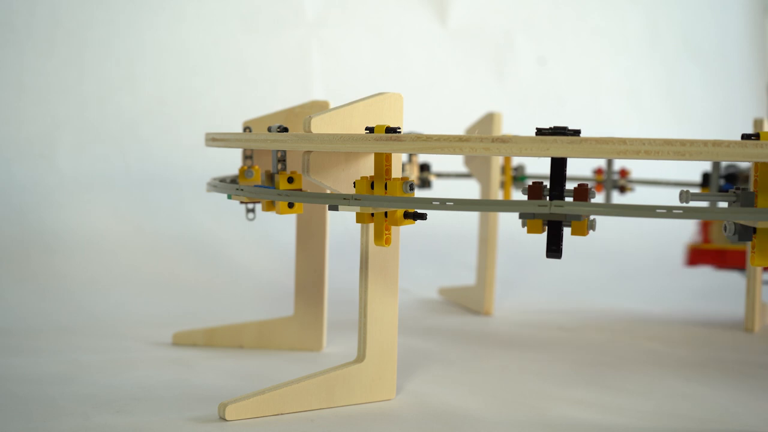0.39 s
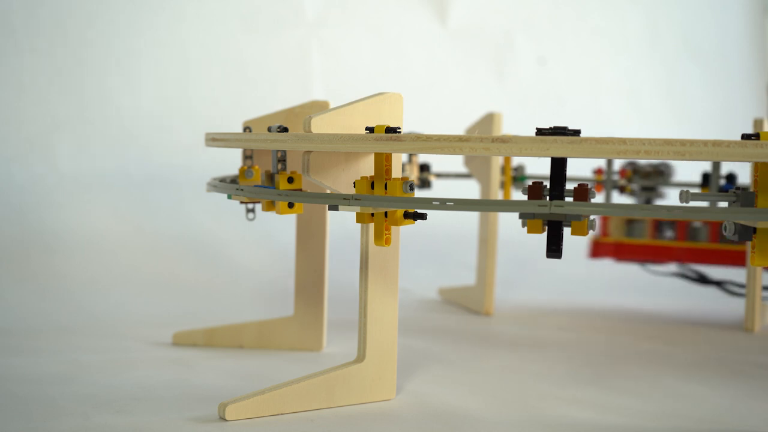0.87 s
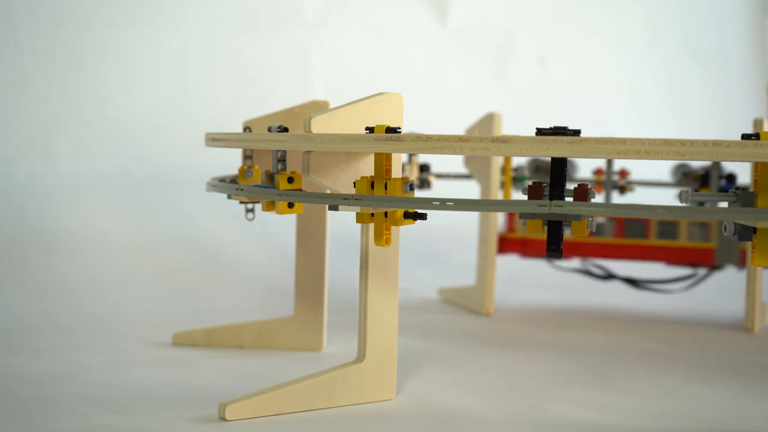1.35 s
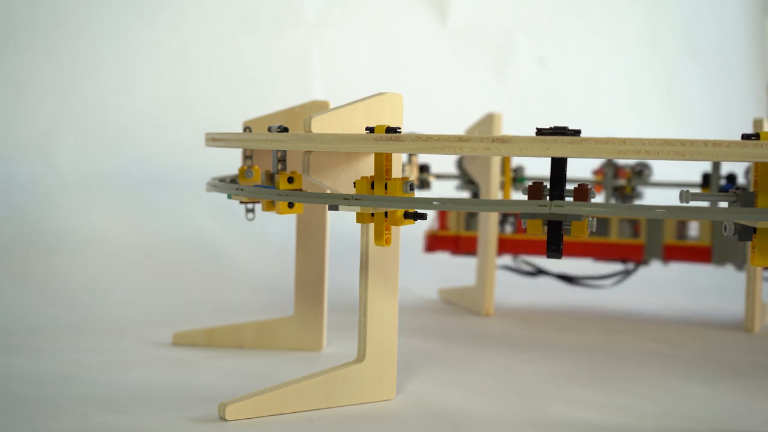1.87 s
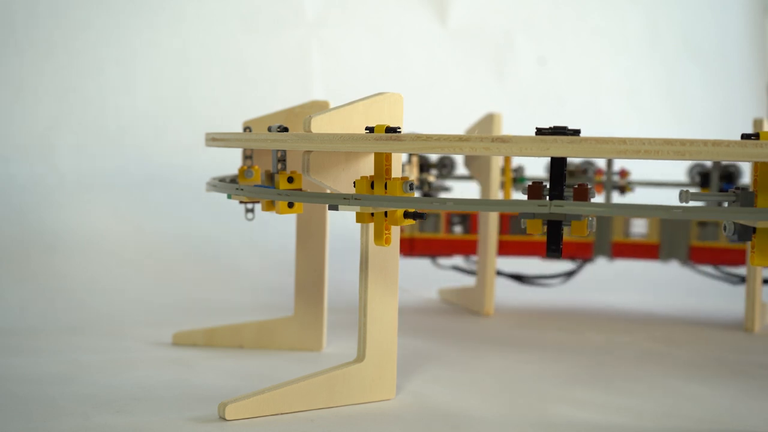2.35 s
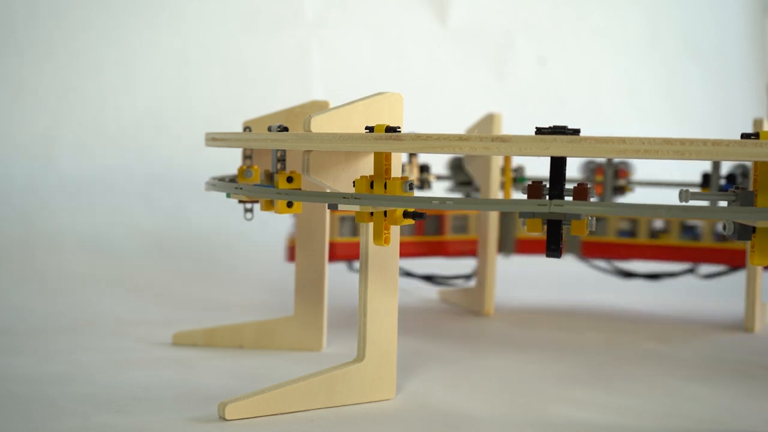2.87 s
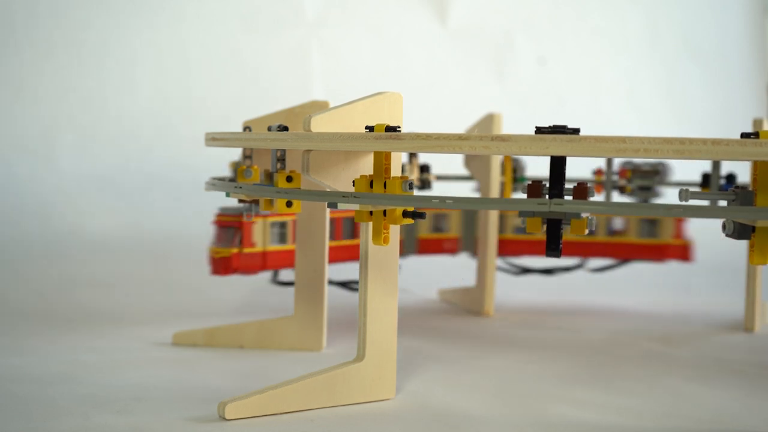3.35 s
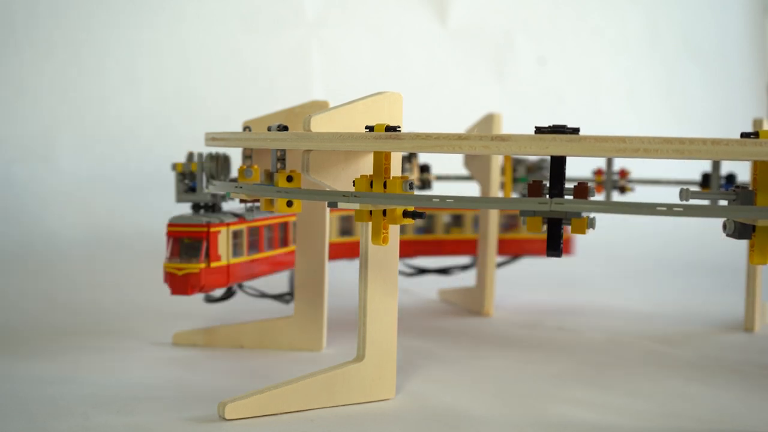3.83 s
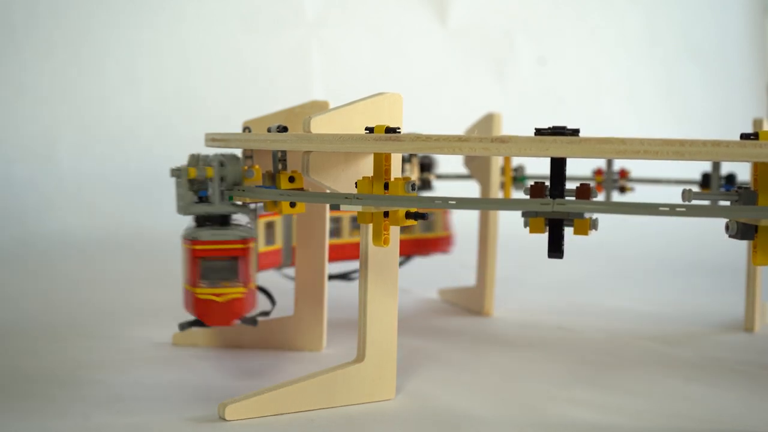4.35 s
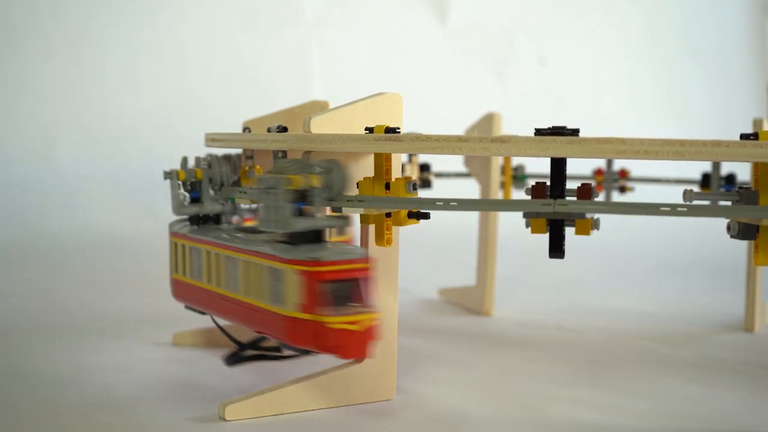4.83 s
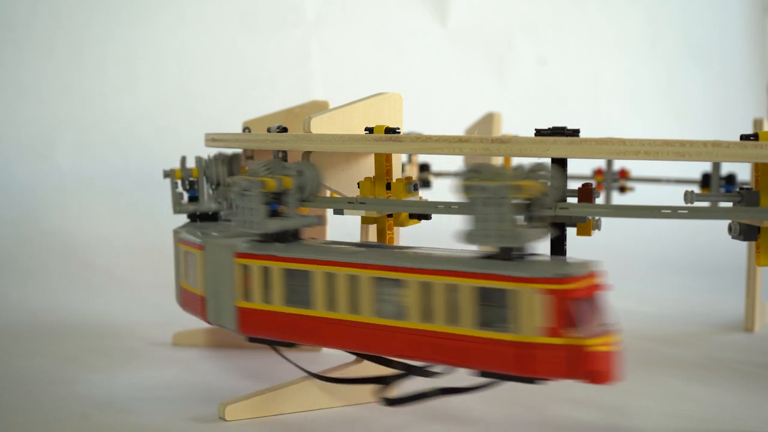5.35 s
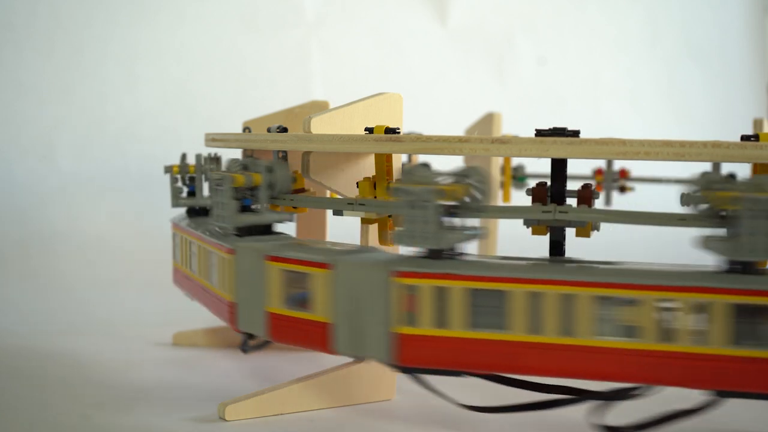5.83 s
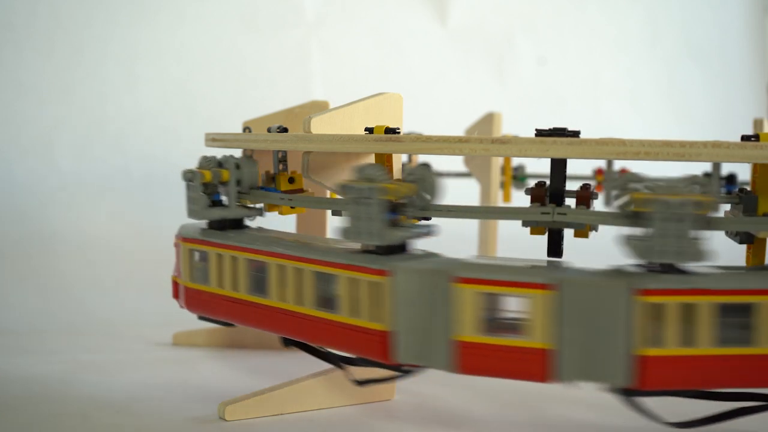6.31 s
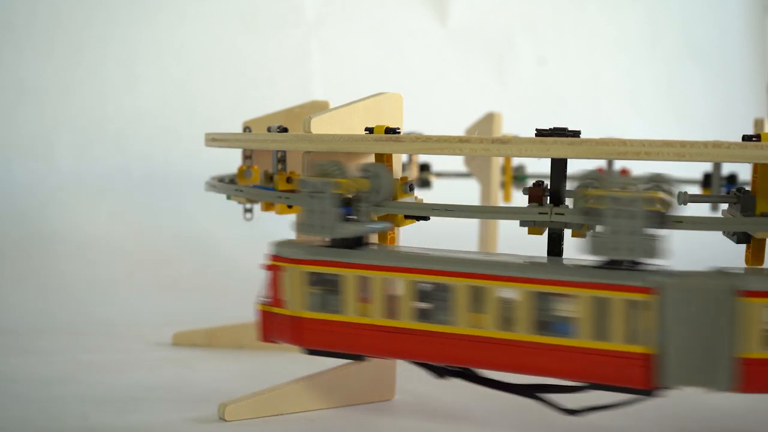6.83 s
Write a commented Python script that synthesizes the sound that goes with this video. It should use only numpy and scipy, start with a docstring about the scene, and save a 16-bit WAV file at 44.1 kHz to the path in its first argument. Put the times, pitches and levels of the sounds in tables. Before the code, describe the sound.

Close stereo pickup, dry and weighted to the left: tiny motors and plastic gears patter in a rough, bright whir, with hollow car bodies rattling and rails humming faintly. After a steady opening it thins near two seconds, where wheels clatter over a joint, then swells to its fullest around five to six seconds as the hanging toy train passes. Small knocks and crisp ticks dot the run, which continues to the end.

```python
"""A dense gear whir patters at once; it fades near 2 s, then returns stronger, over rattle and rumble.
It is a plastic toy monorail hanging from a wooden loop track in a small room.
One uneven meshing force modulates noise shaped by the spectra of gears, car bodies and track.
Narrow resonances of housing, hollow cars, rails and motors swell at set times.
Wheels knock over rail joints as decaying modes, and a part ticks now and then as decaying noise."""
import sys
import numpy as np
from scipy import signal
from scipy.fft import rfft, irfft, next_fast_len
from scipy.io import wavfile
from scipy.ndimage import uniform_filter1d, map_coordinates

SR = 44100
rng = np.random.default_rng(int(sys.argv[2]) if len(sys.argv) > 2 else 0)


def wrap_up_sound(samples):
    """Save the sound to the file named by the first command line argument, as 16-bit audio."""
    columns = np.atleast_2d(samples).T
    # keep every value between -1 and 1, then stretch to whole-number steps
    tamed = np.clip(columns, -1, 1)
    steps = np.round(tamed * 32767).astype(np.int16)
    wavfile.write(sys.argv[1], SR, steps)


def elevation(decibels):
    """Turn decibel levels (scalar or array-like) into linear amplitude ratios."""
    levels = np.asarray(decibels, float)
    return 10 ** (levels / 20)


N = 306495

# Whir level and side over time; it fades near 2 s, then returns stronger:
# (time [s], whir level [dB], brush hiss against whir [dB], left-right difference [dB])
WHIR_COURSE = [(0.0, -41.5, -9.5, -5), (0.19, -39.5, -6, -5), (0.41, -39.5, -8, -4.5),
               (0.95, -41, -9, -4.5), (1.47, -39.5, -6, -5), (1.6, -41.5, -6, -4), (1.79, -44.5, -10, -4),
               (1.83, -48, -10, -4.5), (2.0, -50, -11, -5.5), (2.13, -48, -11, -6), (2.26, -50, -9, -4),
               (2.42, -45, -6, -7), (2.52, -43, -9, -4), (2.61, -40.5, -8, -4), (3.1, -38.5, -8.5, -3),
               (4.0, -37, -9, -2), (4.7, -36, -10.5, -1.5), (5.48, -35.5, -6.5, -2.5),
               (5.79, -36, -8.5, -2.5), (6.3, -35.5, -8, -3), (6.95, -36.5, -5, -5)]
# Rattle and rumble levels over time, dipping near 2 s: (time [s], car rattle level [dB], track roll level [dB])
RATTLE_AND_RUMBLE = [(0, -46, -52.5), (.3, -44.5, -50), (.65, -46.5, -52.5), (1.6, -44.5, -51.5),
                     (1.95, -51, -58), (2.25, -49, -58), (2.45, -47.5, -56), (2.63, -44.5, -56),
                     (3.4, -43, -53), (4.3, -43.5, -53.5), (4.75, -43.5, -51.5), (5.4, -43, -51.5),
                     (6, -43.5, -51.5), (6.95, -44.5, -51)]


def unit(x):
    """Normalisation: scale a signal to rms 1."""
    return x / np.sqrt(np.mean(x ** 2) + 1e-20)


def along(points, hz):
    """Interpolation of (frequency [Hz], value) points on a logarithmic frequency axis."""
    f, v = np.transpose(points)
    return np.interp(np.log(hz + 1), np.log(f + 1), v)


def curves(rows):
    """Linear interpolation in time: one value per sample for each column after the time."""
    s, *columns = np.transpose(rows)
    return [np.interp(np.arange(N) / SR, s, column) for column in columns]


def wobble(rate):
    """Slow random modulation: a smooth curve through random knots, rate knots a second."""
    knots = rng.standard_normal(N // 40 + 4)
    return map_coordinates(knots, [np.arange(N) * rate / SR])


def filtered(x, response):
    """Linear filtering: multiply the spectrum of x by a response of frequency."""
    m = next_fast_len(N + 8192)
    return irfft(rfft(x, m) * response(np.fft.rfftfreq(m, 1 / SR)), m)[..., :N]


def panned(db):
    """Intensity stereo: left and right gains for a left-right level difference."""
    return elevation(np.array([db / 2, -db / 2]))


def pair(two, spectrum):
    """Coherence: coloured mid and side signals give a left-right likeness that varies with frequency."""
    # Microphone pair: (frequency [Hz], left-right correlation [1])
    likeness = [(60, .99), (130, .97), (290, .95), (640, .85), (1410, .74), (3100, .3), (4400, .22),
                (7000, .27), (10000, .32), (15000, .15)]

    def turn(hz):
        return np.arccos(np.clip(along(likeness, hz), -1, 1)) / 2

    def gain(hz):
        # steep roll-off below the first point of the spectrum
        return elevation(along(spectrum, hz)) * np.minimum(hz / spectrum[0][0], 1) ** 4

    mid, side = filtered(two, lambda hz: gain(hz) * [np.cos(turn(hz)), np.sin(turn(hz))])
    return unit(np.array([mid + side, mid - side]))


def patter(spectrum, uneven_db, patchy_db):
    """Shot noise: contacts too dense to count merge into noise, uneven in time and patchy in frequency."""
    z = signal.stft(rng.standard_normal((2, N)), nperseg=512)[2]
    field = rng.standard_normal(z.shape[1:])
    field = uniform_filter1d(field, size=5, axis=0)  # over frequency bins
    field = uniform_filter1d(field, size=10, axis=1)  # over frames
    two = signal.istft(z * elevation(patchy_db * unit(field)), nperseg=512)[1][:, :N]
    return pair(two * elevation(uneven_db), spectrum)


def ring(hz, width_hz, steady=.5):
    """Resonance under random excitation: narrow-band noise on a carrier; steady 0-1 evens its envelope."""
    a, b = filtered(rng.standard_normal((2, 2, N)), lambda f: 1 / (1 + (2 * f / width_hz) ** 3))
    phase = 2 * np.pi * np.cumsum(hz * np.ones(N)) / SR
    envelope = np.hypot(a, b) + 1e-9
    band = (a * np.cos(phase) + b * np.sin(phase)) / envelope ** np.clip(steady, 0, 1)
    return pair(band, [(np.min(hz) / 2, 0)])


def flecks(count, mid_hz, octaves, life_s, spread_db):
    """Transient resonance: small parts along the train sing for a moment at scattered pitches and places."""
    u = rng.random((count, 1))
    z = rng.standard_normal((count, 3))  # pitch, side and strength
    t = np.arange(SR // 12) / SR
    hz = np.clip(mid_hz * 2 ** (octaves * z[:, :1]), 500, SR / 3)
    swell = np.sin(np.pi * np.clip(t / life_s, 0, 1)) ** 2
    rings = elevation(spread_db * z[:, 2:]) * np.sin(2 * np.pi * hz * t) * swell
    at = (u * N).astype(int) + np.arange(len(t))
    sides = panned(4 * z[:, 1:2])
    return unit(np.array([np.bincount(at.ravel(), (rings * g).ravel(), minlength=N)[:N] for g in sides]))


def swelling(rest_db, swells):
    """Amplitude envelope: a wavering rest level summed in power with a smooth arch at each swell."""
    t = np.arange(0, N, 64) / SR
    rises = sum(elevation(db) * np.cos(np.pi * np.clip((t - s) / length, -.5, .5)) ** 2
                for s, *_, db, length in swells)
    rest = elevation(rest_db + 3 * wobble(7))
    return np.hypot(rest, np.interp(np.arange(N) / SR, t, rises))


def gears(mesh):
    """Forced vibration: meshing drives whir, flecks and housing, as brush noise and the motor can ring."""
    # Noise spectra: (frequency [Hz], relative density [dB])
    whir_spectrum = [(1650, -70), (2800, -6.5), (3250, -6), (3730, 0), (4580, 0.5), (6100, 2), (8710, -2.5),
                     (9650, -2), (10800, -10), (14000, -40), (22000, -120)]
    hiss_spectrum = [(6060, -52), (10300, -6), (11300, -3.5), (12400, -0.5), (13200, 2), (14300, -0.5),
                     (15500, -2), (16000, -7)]
    # A gear housing sings up: (centre time [s], frequency [Hz], swell level [dB], full length [s])
    housing_swells = [(2.75, 4670, -54, .5), (3.607, 4650, -57, 0.83), (4.304, 4680, -46, .5),
                      (4.8, 4640, -57, .5), (5.2, 4620, -46, 0.47), (5.598, 4200, -55, .25),
                      (6.001, 4940, -50, .3), (6.36, 4696, -42, 0.18), (6.851, 4620, -45, 0.43)]
    whir_db, hiss_db, pan_db = curves(WHIR_COURSE)

    whir = patter(whir_spectrum, 0.52 * mesh + 0.41 * wobble(30), patchy_db=0.1)
    whir = whir + elevation(-13.5) * flecks(count=1200, mid_hz=5246, octaves=.4, life_s=0.036, spread_db=2.0)

    hiss = patter(hiss_spectrum, 0.77 * mesh + .5 * wobble(40) + 1.0 * wobble(600), patchy_db=1.0)
    can_db = -4.5 + 1.5 * wobble(12) + 1.5 * mesh  # against the hiss
    can_hz = 9700 + 60.5 * wobble(2.5)
    can = elevation(can_db) * ring(can_hz, width_hz=780, steady=.1)

    housing_gain = swelling(whir_db - 18.5, housing_swells)
    housing = housing_gain * ring(curves(housing_swells)[0], width_hz=610, steady=.1)
    return panned(pan_db) * (elevation(whir_db) * (whir + elevation(hiss_db) * (hiss + can)) + housing)


def cars(mesh):
    """Cavity resonance: plastic bodies rattle and their main hollow shifts in pitch as they swing round."""
    # Noise spectrum: (frequency [Hz], relative density [dB])
    rattle_spectrum = [(680, -20), (1150, -7.5), (1420, -1), (1710, -3), (2520, -1), (3400, -8.5),
                       (4420, -28), (7480, -120)]
    # The main hollow sings up: (centre time [s], frequency [Hz], swell level [dB], full length [s])
    hollow_swells = [(0.239, 1458, -54, 0.11), (1.135, 1348, -50, 0.18), (1.354, 1354, -56, 0.83),
                     (1.549, 1600, -56, 0.1), (2.107, 1523, -52, .09), (3.554, 1499, -50, .3),
                     (3.74, 1480, -51, 0.23), (3.901, 1427, -48.5, 0.33), (4.028, 1540, -49.5, 0.27),
                     (4.311, 1498, -47, .2), (4.49, 1508, -47, .12), (4.598, 1502, -52, .07),
                     (4.801, 1490, -50, 0.75), (5.047, 1476, -56, 0.35), (5.439, 1600, -45.5, 0.16),
                     (5.621, 1538, -51, 0.19), (5.867, 1490, -46.5, 0.24), (6.104, 1470, -47.5, .2),
                     (6.37, 1436, -45, 0.16), (6.686, 1470, -53, 0.22), (6.924, 1520, -46.5, .3)]
    rattle_db, roll_db = curves(RATTLE_AND_RUMBLE)
    pan_db = curves(WHIR_COURSE)[2] + 1.5  # the bodies sit left of the motors

    rattle = patter(rattle_spectrum, 0.61 * mesh, patchy_db=0.8)
    rattle = rattle + elevation(-10.5) * flecks(count=500, mid_hz=2185, octaves=.3, life_s=0.05, spread_db=2.0)
    hollow_gain = swelling(roll_db - 8.5, hollow_swells)
    hollow = hollow_gain * ring(curves(hollow_swells)[0], width_hz=184, steady=0.14)
    return panned(pan_db) * (elevation(rattle_db) * rattle + hollow)


def track(mesh):
    """Structure-borne sound: frame rumble and wheel roll, with swelling rail modes, motor hum and murmur."""
    # Noise spectra: (frequency [Hz], relative density [dB])
    rumble_spectrum = [(120, -53), (200, -15.5), (243, -8.5), (333, -7), (580, 1.5), (637, -12), (700, 4.5),
                       (910, -34), (1540, -120)]
    roll_spectrum = [(380, -29), (650, 0), (717, -0.5), (829, 0), (1250, -3), (1620, -30), (2750, -120)]
    deep_spectrum = [(75, -30), (95, -3.5), (120, -4.5), (150, -1), (200, -2), (260, -3), (440, -120)]
    # Rail modes: (frequency [Hz], width at half amplitude [Hz], rest level against the roll [dB])
    rail_modes = [(257, 38, -24.5), (420, 100, -20.5), (635, 19, -15)]
    # A mode swells: (centre time [s], mode frequency [Hz], swell level [dB], full length [s])
    mode_swells = [(.11, 257, -60, 0.14), (0.294, 257, -58.5, 0.27), (0.797, 257, -59.5, 0.35),
                   (1.288, 257, -64, 0.18), (1.62, 257, -64, .15), (2.41, 257, -69, 0.3),
                   (4.647, 257, -66, 0.27), (4.926, 257, -66, .2), (6.904, 257, -75, .3),
                   (.55, 257, -71, 0.44), (1.05, 257, -67, 0.48), (2.75, 257, -74, 0.67),
                   (3.248, 257, -72, .15), (4.302, 257, -72, 0.75), (6.053, 257, -81, 0.26),
                   (.77, 420, -60, 0.22), (1.53, 420, -63, 0.21), (2.62, 420, -64, 0.23),
                   (4.41, 420, -63, 0.21), (4.736, 420, -52, .12), (4.946, 420, -57, .12),
                   (5.297, 420, -56, 0.64), (5.66, 415, -61, 0.6), (5.92, 420, -55, .2),
                   (6.303, 420, -63, 0.21), (6.776, 420, -55.5, 0.17), (0.192, 635, -50, 0.17),
                   (.5, 635, -69, .35), (0.79, 635, -49.5, 0.2), (1.275, 635, -51, 0.11),
                   (2.284, 635, -55.5, .1), (2.6, 635, -49, 0.28), (3.05, 635, -62, 0.23),
                   (4.49, 635, -57, .2), (4.728, 635, -53, 0.14), (5.05, 635, -63, 0.082),
                   (5.597, 635, -59, 0.22), (5.906, 635, -53, .12), (6.07, 635, -53, 0.14),
                   (6.331, 635, -59, .25), (6.778, 635, -55, 0.16)]
    # The motor hum swells: (centre time [s], frequency [Hz], swell level [dB], full length [s])
    hum_swells = [(.2, 721, -54, .2), (0.419, 720, -71, .25), (0.811, 720, -51, 0.2),
                  (1.219, 751, -52, 0.34), (1.515, 762, -51, .25), (1.92, 740, -58, 0.14),
                  (2.851, 725, -55.5, .2), (3.037, 722, -54.5, 0.37), (3.23, 722, -52, .12),
                  (3.947, 705, -61, 0.23), (4.571, 691, -49.5, .14), (4.87, 695, -55, 0.64),
                  (5.901, 720, -55, .12), (6.157, 743, -50, .17), (6.38, 717, -50.5, .2),
                  (6.765, 705, -57, .25)]
    # The deep murmur swells: (centre time [s], swell level [dB], full length [s])
    murmur_swells = [(.95, -77, 0.6), (2.55, -80, .4), (3.712, -81, .5), (5.954, -81, 0.58),
                     (6.847, -75, 0.67)]
    roll_db = curves(RATTLE_AND_RUMBLE)[1]

    rumble = elevation(roll_db - 5) * patter(rumble_spectrum, .5 * mesh, patchy_db=1.86)
    roll = elevation(roll_db) * patter(roll_spectrum, .5 * mesh, patchy_db=1.5)
    deep = swelling(-80.5, murmur_swells) * pair(rng.standard_normal((2, N)), deep_spectrum)

    modes = 0
    for hz, width_hz, rest_db in rail_modes:
        own_swells = [w for w in mode_swells if abs(np.log(w[1] / hz)) < 1 / 5]  # those near this mode
        modes = modes + swelling(roll_db + rest_db, own_swells) * ring(hz, width_hz, steady=0.36)

    hum_gain = swelling(roll_db - 13, hum_swells)
    hum = hum_gain * ring(curves(hum_swells)[0], width_hz=89, steady=0.31)
    return rumble + roll + deep + modes + hum


def room_tone():
    """Background noise: a faint narrow-band drone over the lowest broadband murmur of the room."""
    # (frequency [Hz], relative density [dB])
    spectrum = [(20, -18), (40, -8), (60, 8), (90, -10), (130, -30), (200, -120)]
    murmur = pair(rng.standard_normal((2, N)), spectrum)
    return elevation(-94.5) * ring(68.5, width_hz=7, steady=.3) + elevation(-97) * murmur


def knocks():
    """Impact excitation: joints ring decaying bogie modes roughly; ticks are fast-decaying random pulses."""
    # Wheels over joints: (time [s], peak level before the high-pass [dB], left-right difference [dB])
    joints = [(1.114, -35, -6), (1.535, -42, -3.5), (2.075, -39, -8), (2.085, -38, -6.0), (2.1, -32.5, -10),
              (2.116, -36, -5.5), (2.127, -41, -10), (2.139, -37, -6), (2.206, -39.5, -11),
              (2.784, -42, -2.5), (3.928, -35, -2.0), (4.397, -34, 0), (4.564, -38, -2.0), (4.793, -36, 3),
              (4.927, -31, -1.5), (6.008, -33, -3), (6.345, -37, -2.0)]
    # Modes of the loose bogie: (mean frequency [Hz], mean relative level [dB], 60 dB decay time [s])
    bogie_modes = [(1250, -2.5, 0.018), (1600, -8, 0.041), (2180, -5.5, 0.02)]
    # Sharp ticks: (time [s], starting level before the high-pass [dB], left-right difference [dB])
    tick_events = [(1.479, -33, -5), (3.772, -29, -3), (4.418, -29, -2), (4.455, -21, -1), (5.452, -22, -4),
                   (5.73, -30, -3), (6.520, -35, -4), (6.779, -31, -6)]
    attack_s, roughness, tick_t60_s = .0015, .6, .007
    thuds, ticks = np.zeros((2, 2, N + SR))
    t = np.arange(SR // 8) / SR

    for s, db, pan_db in joints:
        thud = 0
        for hz, level, t60 in bogie_modes:
            decay = elevation(level + rng.normal(0, 2.6) - 60 * t / t60)
            thud = thud + decay * np.sin(2 * np.pi * hz * rng.normal(1, 0.065) * t)
        rough = 1 + roughness * unit(uniform_filter1d(rng.standard_normal(len(t)), size=40))
        thud = thud * rough * (1 - np.exp(-t / attack_s))
        thud = thud / np.abs(thud).max()
        thuds[:, round(s * SR):][:, :len(t)] += elevation(db) * panned(pan_db)[:, None] * thud

    for s, db, pan_db in tick_events:
        crack = rng.choice([-1., 1.], len(t)) * elevation(-60 * t / tick_t60_s)
        ticks[:, round(s * SR):][:, :len(t)] += elevation(db) * panned(pan_db)[:, None] * crack

    def above(cut_hz):
        return lambda hz: np.minimum(hz / cut_hz, 1) ** 3

    return filtered(thuds[:, :N], above(900)) + filtered(ticks[:, :N], above(3100))


def scene():
    """Superposition: one uneven meshing force, slow and fast, modulates gears, cars and track together."""
    mesh = 1.05 * wobble(8.4) + .5 * wobble(25) + 0.63 * wobble(200)
    return gears(mesh) + cars(mesh) + track(mesh) + room_tone() + knocks()


def roll_off(x):
    """The treble ends steeply here."""
    return signal.sosfilt(signal.butter(12, 17010, fs=SR, output="sos"), x)


def record(dry):
    """Stereo pickup: level and phase differ between channels by frequency; deep bass and top are cut."""
    # Channel level: (frequency [Hz], left-right difference [dB])
    lean_points = [(100, -0.5), (1500, -2), (4500, 2), (7000, -0.5), (9600, -4.5), (14000, 0.5)]
    # Channel phase: (frequency [Hz], angle by which left leads [rad])
    lead_points = [(2400, 0.1), (4400, -0.24), (5500, 1.43), (10000, 1.34), (16000, 1.7)]
    top_hz = 15830

    def response(hz):
        bass_cut = 1 / (1 + (30 / (hz + 1)) ** 4)
        lead = np.exp(.5j * np.outer([1, -1], along(lead_points, hz)))
        return panned(along(lean_points, hz)) * lead * bass_cut * (hz < top_hz)

    return roll_off(filtered(dry, response))


dry = scene()
out = record(dry)
wrap_up_sound(out)
```